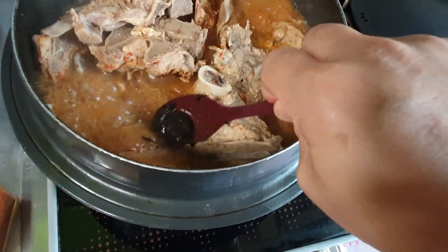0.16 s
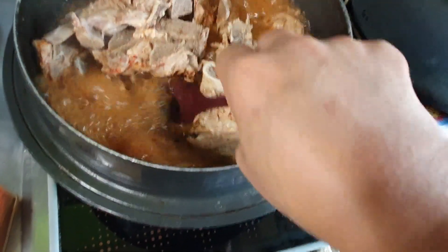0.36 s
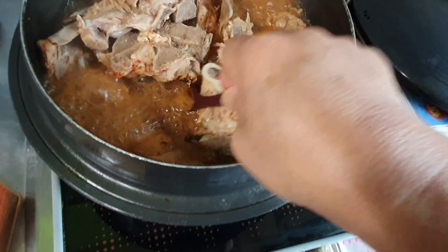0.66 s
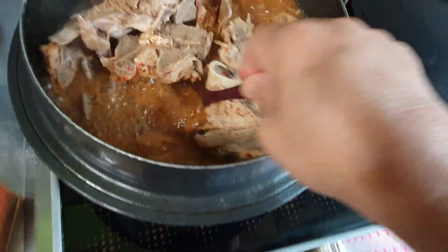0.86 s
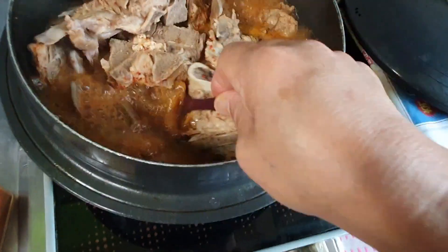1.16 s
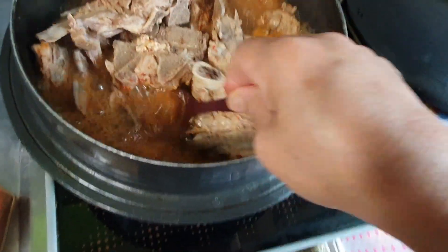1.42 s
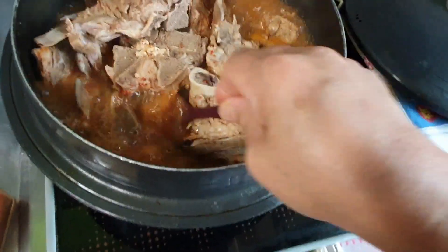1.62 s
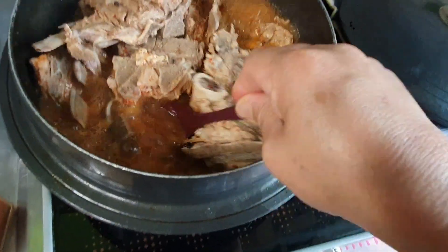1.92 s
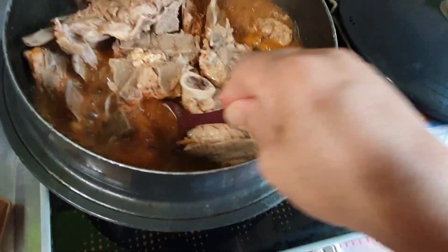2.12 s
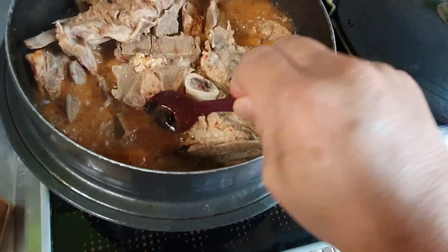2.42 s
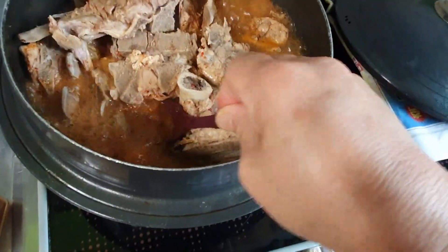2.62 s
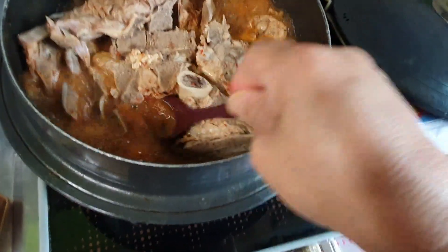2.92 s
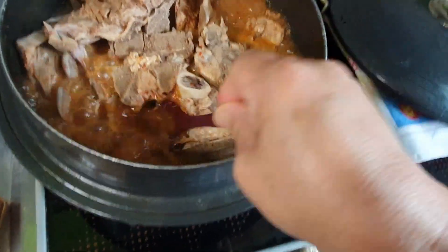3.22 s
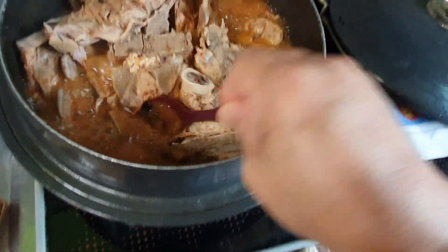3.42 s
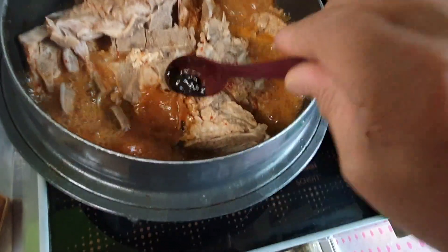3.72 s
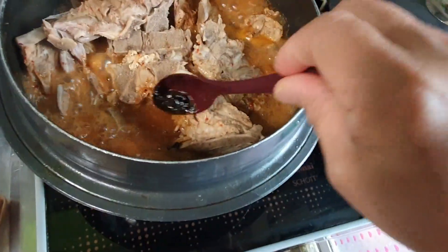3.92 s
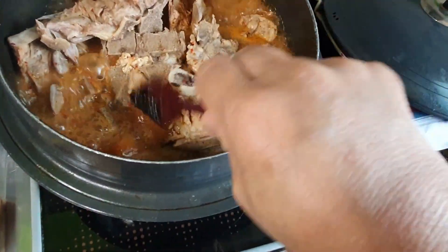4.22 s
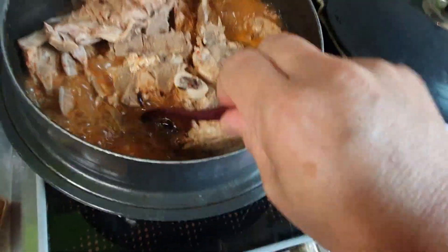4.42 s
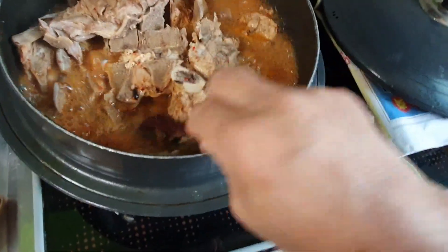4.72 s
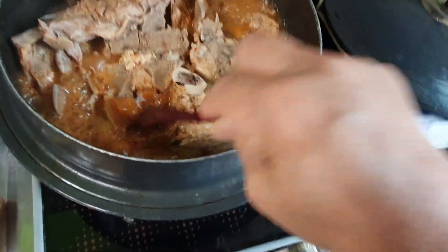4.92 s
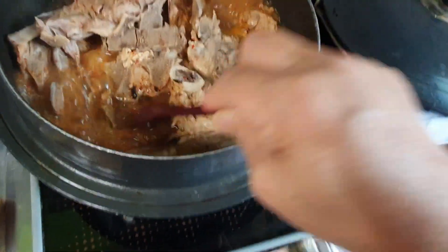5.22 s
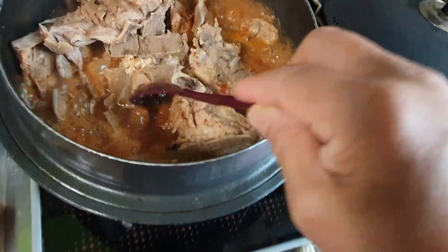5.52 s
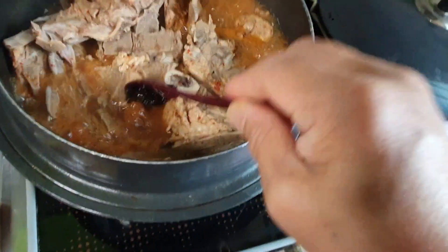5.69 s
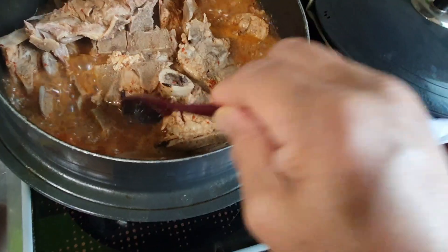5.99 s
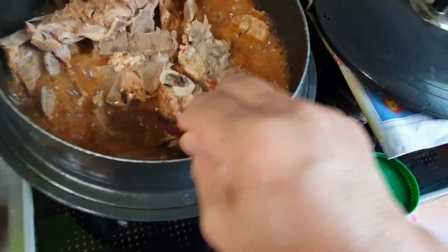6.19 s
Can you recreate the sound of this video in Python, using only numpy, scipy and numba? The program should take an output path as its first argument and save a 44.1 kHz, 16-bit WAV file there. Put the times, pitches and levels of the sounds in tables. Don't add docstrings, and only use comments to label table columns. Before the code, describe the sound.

A strong low hum and breathy fan noise run constantly under bubbling broth. Dense gurgles and hollow plops crowd the opening, thin out near the middle, then return as a moderate simmer. A plastic spoon ticks faintly against pot and bone, droplets patter on the wall of the pot and fat snaps brightly. Close phone microphones, pot to the left, short small-kitchen reflections.

```python
import sys
import numpy as np
from scipy import signal
from scipy.fft import rfft, irfft
from scipy.io import wavfile
from scipy.ndimage import uniform_filter1d
from numba import njit

SR = 44100
rng = np.random.default_rng(int(sys.argv[2]) if len(sys.argv) > 2 else 0)


def digitize_waveform(pressure):
    field = np.atleast_2d(pressure).T
    bounded = np.clip(field, -1, 1)
    quanta = np.round(bounded * 32767).astype(np.int16)
    wavfile.write(sys.argv[1], SR, quanta)


def boost_factor(decibels):
    exponent = np.asarray(decibels, float) / 20
    return 10 ** exponent


N = 280035
PORT_LAG = 16


def band(x, lo_hz, hi_hz):
    sos = signal.butter(2, [lo_hz, min(hi_hz, .45 * SR)], "band", fs=SR, output="sos")
    return signal.sosfilt(sos, x)


def unit(x):
    return x / np.sqrt(np.mean(x ** 2))


def walk(rate):
    hold = int(SR / rate)
    levels = np.repeat(rng.standard_normal(N // 100), hold)[:N]
    return 1.7 * uniform_filter1d(uniform_filter1d(levels, hold), hold)


def hum():
    # (pitch [Hz], left level [dB rms], left minus right [dB], left lead [rad])
    hum_tones = [(59.97, -43.0, -1.2, -0.1), (99.97, -51.1, -1.4, -0.1), (119.95, -16.9, -1.1, 0.0),
                 (139.97, -53.6, -1.5, 0.1), (179.94, -36.1, 1.0, -0.2), (239.89, -41.9, -2.8, 0.1),
                 (259.91, -49.6, -1.9, -0.4), (279.74, -58.0, -2.5, 0.0), (299.89, -43.6, -2.8, -0.6),
                 (359.88, -55.7, 2.2, -0.4), (379.94, -63.4, -4.1, 0.1), (399.98, -56.9, -4.2, -0.1),
                 (419.81, -60.2, -5.6, 0.3), (479.81, -60.4, -3.1, 0.3), (599.82, -63.3, -4.5, 1.3),
                 (659.77, -59.3, -6.2, 0.6), (679.75, -63.1, -3.5, 0.1), (719.72, -60.6, -2.6, -0.1),
                 (2359.02, -78.0, -5.7, -1.3)]
    mains_hz = 59.978
    shaft_hz = mains_hz / 3
    t = np.arange(N) / SR
    load, slip = walk(1.5), walk(1.2)
    out = 0
    for hz, db, pan_db, lead in hum_tones:
        order = np.round(hz / shaft_hz)
        free = order % 3 > 0
        turns = order * shaft_hz * t
        turns = turns + rng.random() * (db < -30)
        phase = 2 * np.pi * turns + free * .5 * slip + .003 * order * load
        size = np.sqrt(2) * boost_factor(db + (.13 + .9 * free) * walk(3))
        left = np.sin(phase)
        right = boost_factor(-pan_db) * np.sin(phase - lead)
        out = out + size * np.array([left, right])
    return out


def broth():
    # (time [s], peak level [dB], pitch [Hz])
    bubbles = [(0.0327, -35, 1230), (0.073, -51, 915), (0.2253, -31.5, 1150), (0.246, -30, 1170),
               (0.3143, -28.5, 1205), (0.3463, -24, 896), (0.4082, -38, 1190), (0.7361, -26.5, 834),
               (0.834, -28, 1225), (0.861, -28.5, 640), (1.0934, -29, 900), (1.222, -34, 894),
               (1.2735, -32, 670), (1.3115, -30, 800), (1.4226, -32, 783), (1.6739, -31, 870),
               (1.7976, -29, 1206), (2.2933, -32, 866), (2.4921, -28, 1170), (2.525, -29.5, 843),
               (2.7779, -32, 1200), (3.3486, -27.5, 592), (3.483, -37, 1060), (4.3701, -35.5, 950),
               (4.588, -34.5, 950), (4.9468, -29.5, 1013), (5.2442, -33.5, 686), (5.8168, -30, 920),
               (6.1377, -29, 650), (6.2674, -32, 984)]
    plops = [(0.031, -51.5, 1570), (0.112, -35.5, 1590), (0.181, -30.5, 2020), (0.247, -42, 1320),
             (0.3162, -43, 1360), (0.4429, -39, 1280), (0.8154, -41.5, 1240), (0.833, -38.5, 1520),
             (0.8603, -26, 1280), (1.301, -47, 1450), (1.462, -44, 1320), (1.5314, -33, 1280),
             (1.7709, -31.5, 1470), (1.7968, -38, 1250), (2.1515, -27, 1900), (2.2878, -39, 1540),
             (2.493, -39, 1230), (2.5287, -30.5, 2190), (2.9088, -30.5, 1870), (3.1732, -34, 1310),
             (3.437, -38.5, 1610), (3.4865, -30, 1400), (3.6355, -31, 1440), (3.9608, -31, 1450),
             (4.374, -30, 1550), (4.876, -40, 1500), (4.9403, -39, 1510), (5.5223, -45.5, 1480),
             (5.82, -47, 1320), (6.1617, -41, 1870)]
    gurgles = [(0.181, -27, 905), (0.2931, -36, 1120), (0.3228, -29, 660), (0.3563, -32, 636),
               (0.5753, -37, 1120), (0.612, -32.5, 1240), (0.6728, -34, 1146), (0.6895, -36, 860),
               (0.772, -31, 890), (1.0385, -41, 1140), (1.1524, -31, 926), (1.2478, -32, 880),
               (2.001, -31.5, 1060), (2.6595, -35.5, 750), (2.7926, -29, 900), (2.893, -28, 743),
               (2.924, -35.5, 1250), (3.313, -39, 800), (3.4394, -30.5, 996), (3.5731, -41.5, 905),
               (3.8906, -33.5, 1270), (4.118, -33, 1200), (4.3073, -34.5, 906), (4.704, -32.5, 883),
               (5.1704, -35, 1110), (5.7855, -34.5, 700), (5.8556, -34, 980), (6.0067, -35, 1100),
               (6.093, -35.5, 800), (6.1972, -33.5, 950)]
    s, db, hz = np.transpose(list(bubbles) + list(plops) + list(gurgles))
    same = np.ones(len(s))
    bursts = grains((s * SR).astype(int), .95 * hz, 3.2 * same, .05 * same, boost_factor(db + 8))
    closing = ((s + .006) * SR).astype(int)
    cavities = grains(closing, .7 * hz, 5 * same, .055 * same, boost_factor(db - 9))
    simmer = swarm(120, 520, 1500, 1.9, scatter_db=3.8, db=-48.5)
    fizz = swarm(320, 1300, 4500, 3.0, scatter_db=2.4, db=-63)
    small = simmer + fizz
    column = unit(band(small, 795, 855)) * boost_factor(-57) + unit(band(small, 975, 1075)) * boost_factor(-58)
    pops = swarm(60, 700, 2000, 3.4, scatter_db=1.6, db=-54.5)
    crackle = swarm(260, 9600, 14500, 3.1, scatter_db=3.5, db=-61)
    return bursts + cavities + pops + small + column + crackle


def swarm(rate, lo_hz, hi_hz, cycles, scatter_db, db):
    # (time [s], effort [dB])
    boil_effort = [(0, 4), (.3, 4.5), (.6, -3), (.9, 3.5), (1.3, -1.5), (2, -1.5), (2.4, -5.5), (2.8, -2.5),
                   (3.5, 1), (4.2, 1), (5, 0.1), (5.6, 1), (6.35, 0)]
    when, pitch, life, rise, luck = rng.random((4000, 5))[:int(rate * N / SR)].T
    size_db = -scatter_db * np.log(.04 + luck)
    size_db = size_db + np.interp(when * N / SR, *np.transpose(boil_effort))
    start = (when * N).astype(int)
    hz = lo_hz * (hi_hz / lo_hz) ** pitch
    x = grains(start, hz, cycles * (.5 + life), .61 * rise, boost_factor(size_db))
    return unit(x) * boost_factor(db)


@njit
def grains(start, hz, cycles, glide, size):
    out = np.zeros(N)
    for e in range(len(start)):
        life = cycles[e] * SR / hz[e]
        phase = 0.
        for i in range(min(int(2 * life), N - start[e])):
            phase += 2 * np.pi * hz[e] / SR * (1 + glide[e] * i / life)
            swell = 1.7 * (1 - np.exp(-10 * i / life)) * np.exp(-3.5 * i / life)
            out[start[e] + i] += size[e] * swell * np.sin(phase)
    return out


def ticks():
    # (time [s], peak level [dB], pitch [Hz])
    spoon_ticks = [(0.1488, -36, 3320), (0.1785, -35, 2890), (0.213, -36, 2500), (0.3033, -47, 2560),
                   (0.5337, -41, 2810), (0.8581, -55, 3000), (0.9757, -38, 2840), (1.351, -43.5, 2600),
                   (1.5085, -42, 2520), (1.716, -42.5, 2720), (1.7729, -33, 3080), (2.0424, -41, 2730),
                   (2.1515, -47, 2540), (2.5233, -43.5, 2500), (2.5262, -50, 2860), (2.7926, -43, 2520),
                   (2.819, -35, 2480), (2.971, -47, 2640), (3.3133, -50, 2730), (3.583, -46.5, 2730),
                   (3.6337, -50.5, 3560), (4.187, -39, 2500), (4.245, -33, 4050), (4.376, -43.5, 2640),
                   (4.4852, -55.5, 2800), (5.3016, -41, 3740), (5.8212, -40, 3060), (6.1603, -36.5, 3600)]
    fat_spits = [(0.2652, -43.5, 11570), (0.5905, -40, 11500), (0.7545, -45, 12230), (0.9254, -50, 8290),
                 (1.109, -42.5, 8900), (1.257, -37.5, 9000), (1.3473, -37.5, 8700), (1.7764, -43.5, 7700),
                 (1.9257, -42, 10780), (2.0428, -42, 8260), (2.164, -37, 12140), (2.4059, -50, 12040),
                 (2.894, -39, 8600), (2.9704, -44, 11220), (3.265, -42.5, 8400), (3.3141, -47.5, 8540),
                 (3.3892, -38.5, 8700), (4.1178, -42.5, 8700), (4.2418, -25, 13040), (4.7398, -47, 8550),
                 (4.8496, -45, 12170), (5.2894, -48, 9000), (5.8977, -39, 8330), (6.1837, -41, 13820)]
    droplets = [(0.1058, -45.5, 4740), (0.3258, -40.5, 5750), (0.3775, -53, 4900), (0.7627, -44, 5130),
                (1.344, -52, 5240), (1.3513, -39.5, 4950), (1.5802, -45.5, 5740), (1.7295, -53, 5020),
                (1.7737, -53, 4830), (2.164, -51.5, 5880), (2.5454, -44, 6960), (2.8953, -41, 5070),
                (2.9708, -44, 4600), (3.2024, -47, 4580), (3.3142, -38, 6100), (4.117, -54, 4520),
                (4.125, -61, 4960), (4.2373, -42, 4510), (5.3025, -51, 4960), (5.8224, -48.5, 4820),
                (6.1738, -40.5, 4640), (6.1825, -53, 4860)]
    spoon = spray(spoon_ticks, spray_s=.0045, gain_db=4.5, lift=.9)
    fat = spray(fat_spits, spray_s=.0025, gain_db=.5, lift=1.1)
    return spoon + fat + spray(droplets, spray_s=.0035, gain_db=3.5)


def spray(events, spray_s, gain_db, lift=1):
    s, db, hz = (np.repeat(c, 14) for c in np.transpose(events))
    late, spread = rng.random((500, 2))[:len(s)].T
    start = ((s + spray_s * late ** 2) * SR).astype(int)
    pitch_hz = np.minimum(lift * hz * np.exp(.7 * (spread - .55)), .34 * SR)
    cycles = 2 + pitch_hz / 2500
    size = boost_factor(db + gain_db + hz / 4000 - 9 * late)
    return grains(start, pitch_hz, cycles, .03 + 0 * s, size)


def air():
    # (frequency [Hz], left level [dB per Hz], left minus right [dB], likeness of the ports [0-1])
    noise_spectrum = [(25.7, -84, -1, 0.92), (56.9, -72, -4, 0.94), (99, -63, 0.5, 0.9), (216, -63, 0, 0.9),
                      (263, -68, -2.5, 1), (323, -73, 1, 0.96), (517, -80.5, -6, 0.67),
                      (660, -70, -0.5, .75), (950, -79, 6.5, 0), (2140, -89, -2.5, 0),
                      (7060, -101, 4, 0.01), (8600, -96, 6.5, 0.18), (9300, -98, 9.5, 0.5),
                      (12500, -98, 11.5, 0.6)]
    f = np.fft.rfftfreq(N, 1 / SR) + 1
    columns = np.transpose(noise_spectrum)
    hz, db, pan_db, like = (np.interp(np.log(f), np.log(columns[0]), c) for c in columns)
    like = np.clip(like, 0, .999)
    late = np.exp(-2j * np.pi * np.maximum(f - 480, 0) * PORT_LAG / SR)
    mid, side = (rfft(rng.standard_normal(N)) * np.sqrt(SR / 4) * boost_factor(db) for _ in range(2))
    mid = mid * np.sqrt(1 + like)
    side = side * np.sqrt(1 - like)
    pair = np.array([mid + side, (mid - side) * boost_factor(-pan_db) * late])
    swell, fizz = walk(2.5), walk(110)
    out = 0
    for octave in range(4, 15):
        share = np.clip(1 - abs(np.log2(f) - octave), 0, 1)
        flicker_db = .6 * swell + .55 * walk(14) + 1.5 * (octave > 12) * fizz
        out = out + irfft(pair * share, N) * boost_factor(flicker_db)
    return out


def tail(t60_s, delay_s):
    t = np.arange(SR // 3) / SR
    fade = np.exp(-np.log(1000) * t / t60_s) * (t > delay_s)
    response = rng.standard_normal((2, len(t))) * fade
    return response / np.sqrt(np.sum(response ** 2, axis=1, keepdims=True))


def scene():
    pot = broth() + ticks()
    low = signal.sosfilt(signal.butter(1, 1300, fs=SR, output="sos"), pot)
    shaded = np.roll(.42 * low, PORT_LAG - 9) + np.roll(.1 * (pot - low), PORT_LAG)
    pot_echo = boost_factor(-7) * tail(t60_s=.035, delay_s=.0016)
    kitchen_echo = boost_factor(-12) * tail(t60_s=.2, delay_s=.0055)
    wet = signal.fftconvolve(pot[None], pot_echo + kitchen_echo, axes=1)[:, :N]
    wet_db = np.array([[-3], [2.5]])
    return hum() + air() + np.array([pot, shaded]) + wet * boost_factor(wet_db)


def low_pass(x):
    return signal.sosfilt(signal.butter(12, 15710, fs=SR, output="sos"), x)


def record(dry):
    top = signal.ellip(8, .2, 60, 15500, fs=SR, output="sos")
    return low_pass(signal.sosfilt(top, dry))


dry = scene()
out = record(dry)
digitize_waveform(out)
```